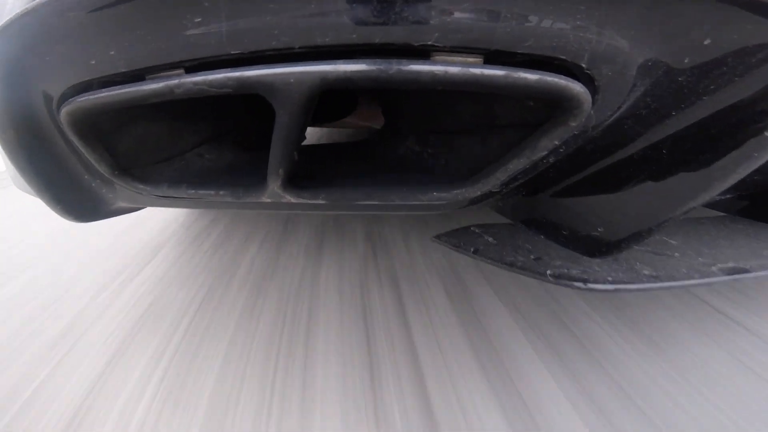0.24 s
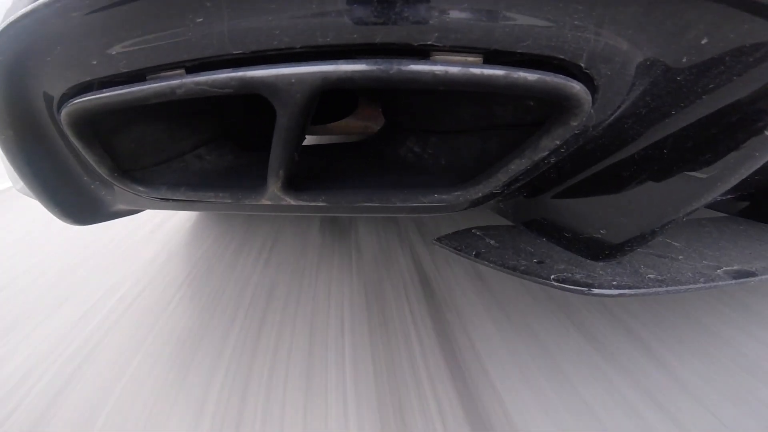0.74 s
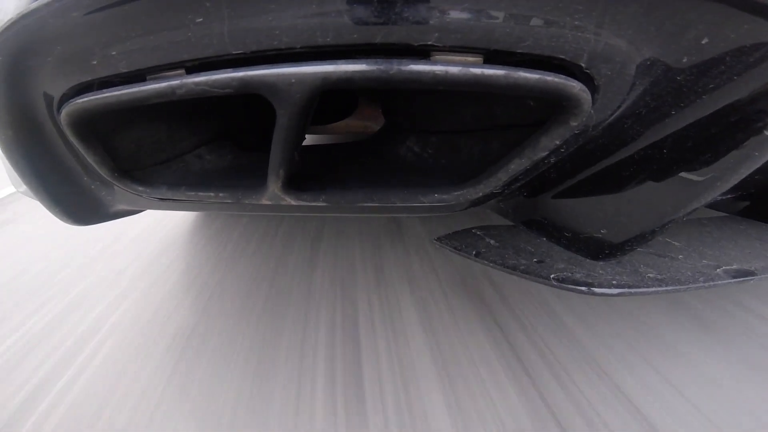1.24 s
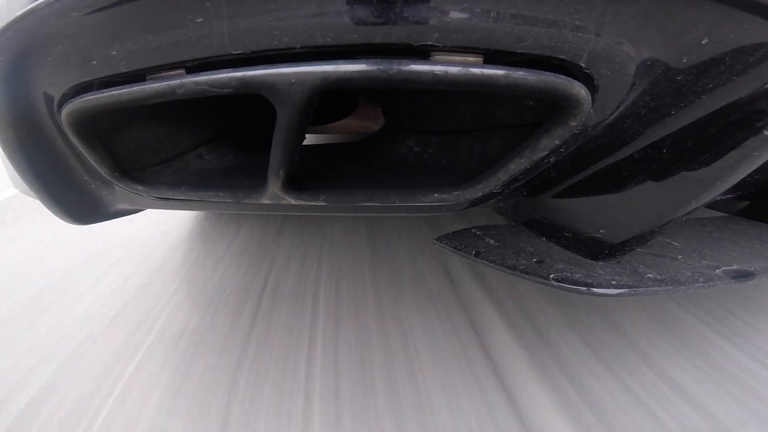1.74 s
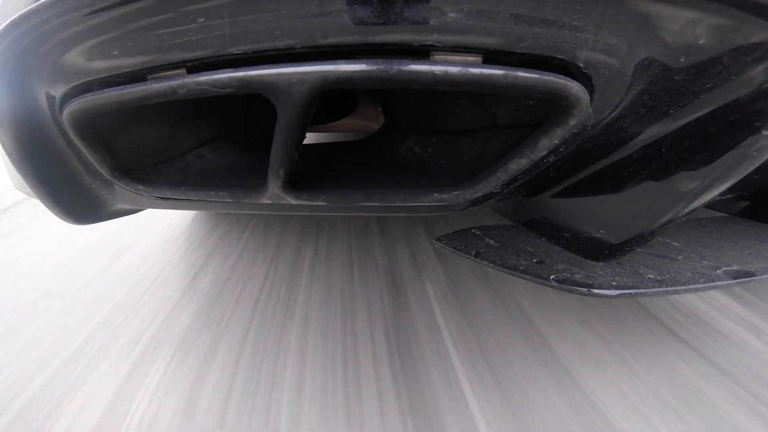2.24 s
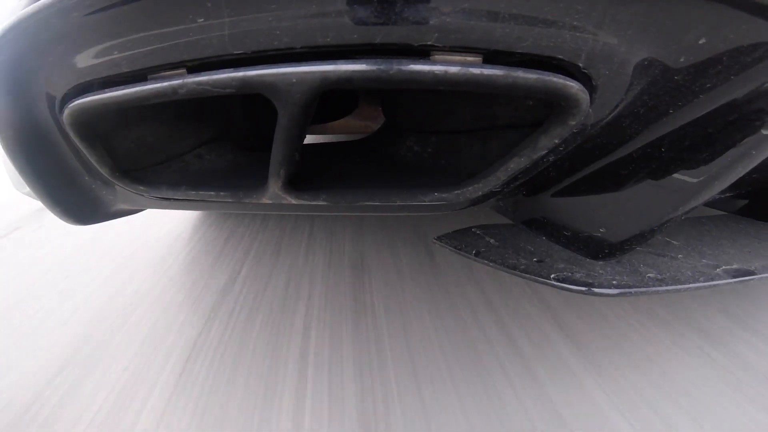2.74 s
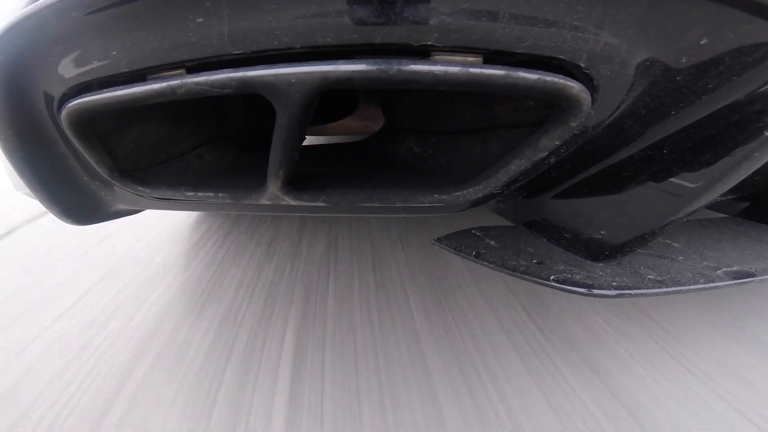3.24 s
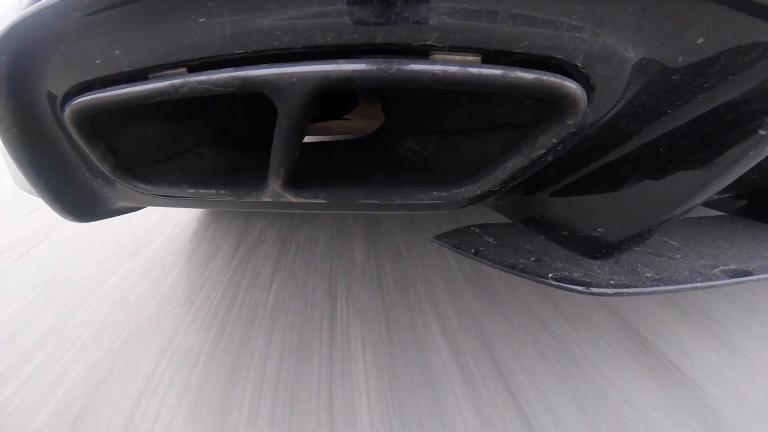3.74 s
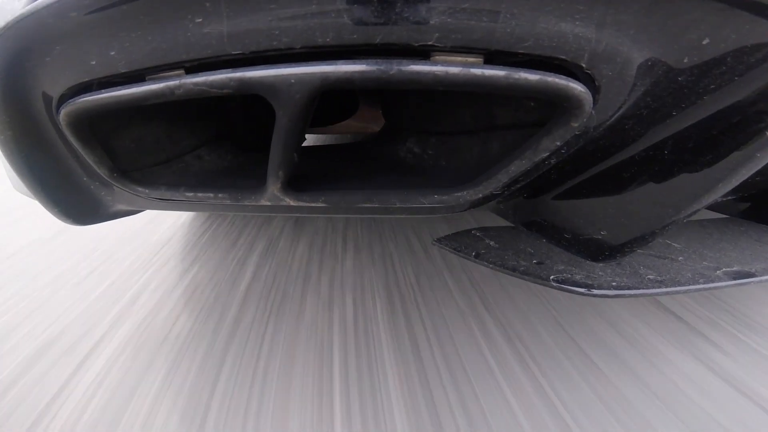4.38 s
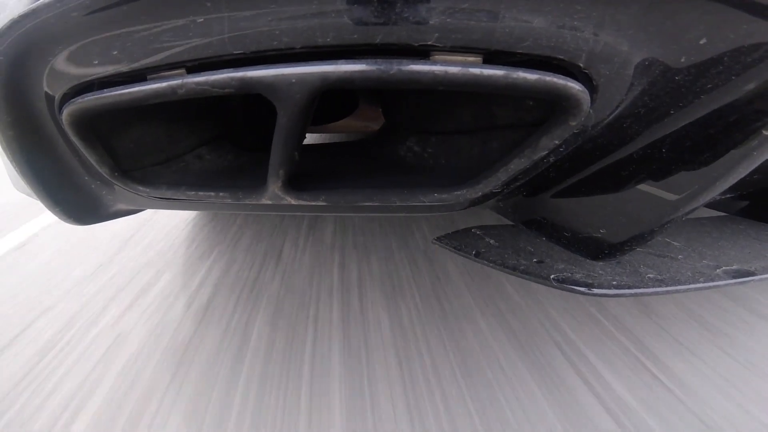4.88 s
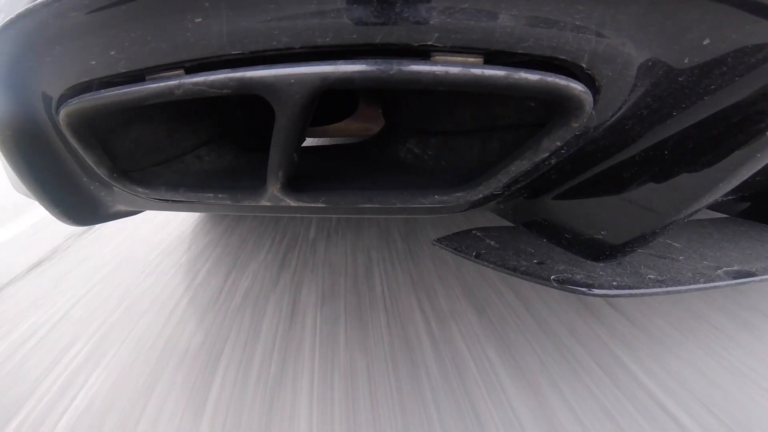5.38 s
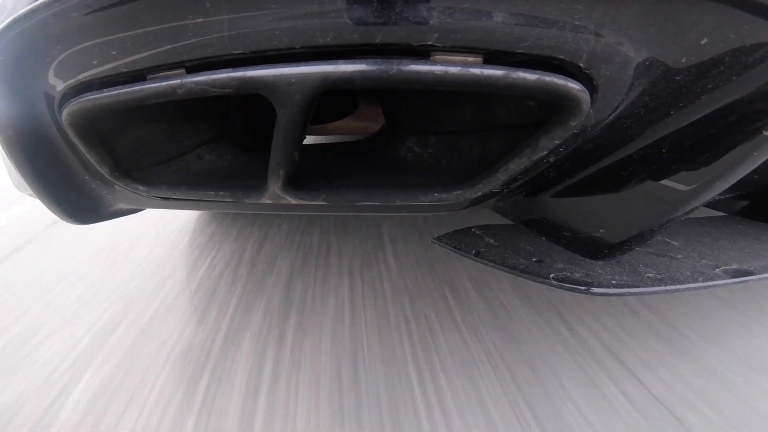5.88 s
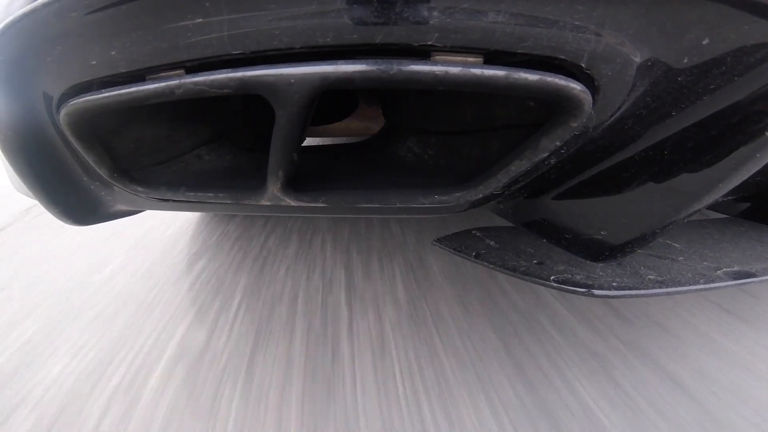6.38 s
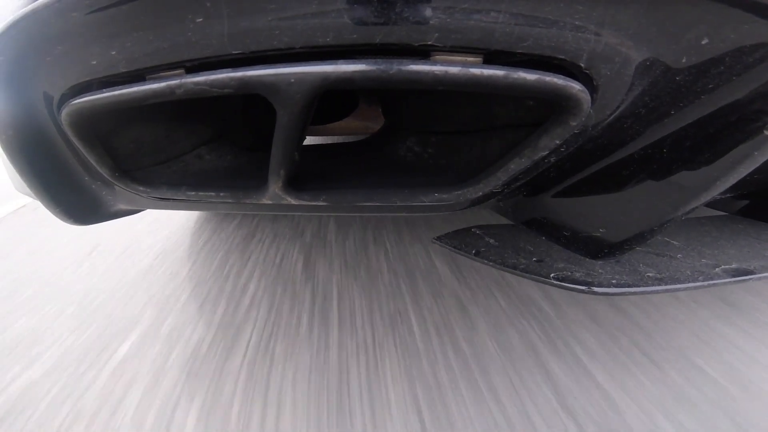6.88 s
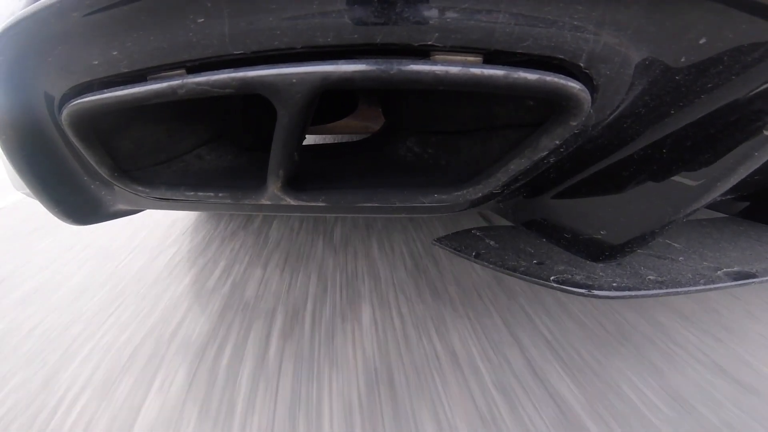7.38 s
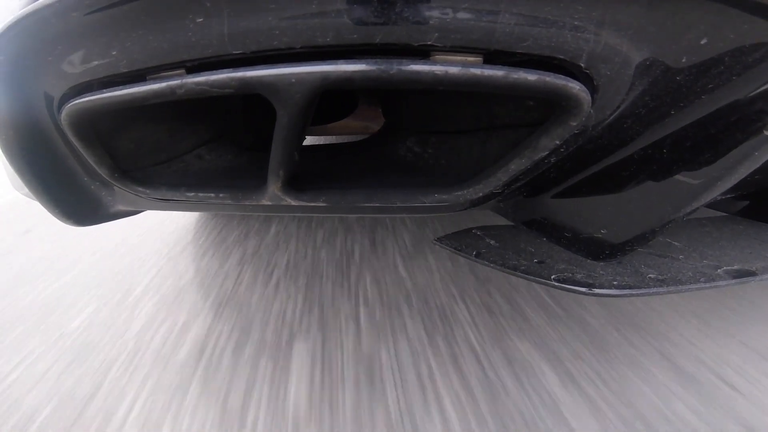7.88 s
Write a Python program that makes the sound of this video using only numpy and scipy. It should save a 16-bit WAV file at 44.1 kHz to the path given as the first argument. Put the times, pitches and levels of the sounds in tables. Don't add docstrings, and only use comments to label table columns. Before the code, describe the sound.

Very close, dry outdoor pickup beside the exhaust of a car lifting off the throttle. Crackling, raspy bangs come first, then two loose clusters of deeper, ringing pops with low thumps. The background is ducked by them and opens up again: a steady buzzing hum falling gradually in pitch, with road hiss, wind rumble and a hollow tyre resonance late on.

```python
import sys
import numpy as np
from scipy import signal
from scipy.io import wavfile
from scipy.ndimage import uniform_filter1d, map_coordinates

SR = 44100
rng = np.random.default_rng(int(sys.argv[2]) if len(sys.argv) > 2 else 0)


def attenuation_scalar(level_db):
    decades = np.asarray(level_db, float) / 20
    return 10 ** decades


def wav_out(sig):
    wavfile.write(sys.argv[1], SR, np.round(np.clip(np.atleast_2d(sig).T, -1, 1) * 32767).astype(np.int16))


N = 358091


def evened(x):
    return x / np.sqrt(np.mean(x ** 2) + 1e-20)


def curves(rows):
    s, *columns = np.transpose(rows)
    return [np.interp(np.arange(N) / SR, s, c) for c in columns]


def add(mix, s, sound):
    part = mix[round(s * SR):][:len(sound)]
    part += sound[:len(part)]


def wander(hz):
    knots = rng.standard_normal(2000)
    smooth = map_coordinates(knots, [np.arange(0, N + 64, 64) / SR * hz], order=3)
    return np.interp(np.arange(N), np.arange(len(smooth)) * 64, smooth)


def slope(points):
    f, db = np.transpose(points)
    return lambda hz: attenuation_scalar(np.interp(np.log(hz + 1), np.log(f + 1), db, left=-60, right=-90))


def noise(shape, patchy_db, flicker_db, size):
    frames, hz = 4 * N // size + 5, np.fft.rfftfreq(size, 1 / SR)
    a, b, patches = rng.standard_normal((frames, len(hz), 3)).T
    patches = uniform_filter1d(patches, size=8, axis=0)
    patches = evened(uniform_filter1d(patches, size=8, axis=1))
    flicker = rng.standard_normal(frames)
    z = (a + 1j * b) * shape(hz)[:, None] * attenuation_scalar(patchy_db * patches + flicker_db * flicker)
    return evened(signal.istft(z, nperseg=size, noverlap=3 * size // 4)[1][:N])


# time in seconds, amount from 0 to 1.
MISFIRING = [(0, 0.94), (.46, 0.85), (.56, 0.6), (.9, 0.5), (1.45, 0.3), (1.9, 0), (2.4, 0.09), (8.12, 0.2)]


def misfiring():
    return curves(MISFIRING)[0]


def running(clean, added):
    return clean + added * misfiring()


# time in seconds, level in dB.
FLOW_LEVEL = [(0, -32.5), (.04, -37), (.15, -54), (.33, -44), (.47, -43.5), (.6, -52), (.96, -40.5),
              (1.07, -43.5), (1.67, -39), (2.41, -35), (3.63, -32.5), (4.9, -31.5), (5.8, -32.5),
              (6.35, -35.5), (6.71, -36.5), (6.86, -39.5), (8.12, -40)]


def flow_db():
    return curves(FLOW_LEVEL)[0]


# frequency in Hz, width in Hz, level in dB.
PIPE_MODES = [(70, 130, -4.5), (220, 34, -9), (259.6, 27, -11), (320, 31.5, 1.5), (382.7, 38, -12.5),
              (449, 65, -13), (625, 57, -9.5), (662.2, 46, -2.5), (726, 9.7, -17)]


def pipe_gain(hz):
    dip = 1 - .92 / (1 + ((hz - 462) / 18) ** 2)
    power = sum(attenuation_scalar(2 * db) / (1 + (2 * (hz - f) / w) ** 2) ** 1.95 for f, w, db in PIPE_MODES)
    return dip * np.sqrt(power)


# middle in seconds, level over the lull in dB,
# half-length in seconds.
GUSTS = [(0.095, 12.5, 0.19), (0.333, 6, .05), (0.723, 6, 0.03), (0.983, 4, 0.03), (1.2, 3, .1),
         (1.85, -1, 0.052), (2.228, 8, 0.34), (2.554, 4.5, .08), (3.492, 7.5, 0.11), (3.84, 11.5, 0.073),
         (4.326, 9.5, 0.22), (4.828, 9.5, 0.067), (5.071, 7, 0.09), (5.798, 9.5, 0.61), (6.37, 3, 0.042),
         (6.593, 8, 0.053), (6.865, 12, 0.19), (7.202, 12, 0.058), (7.43, 11, 0.081), (7.648, 12, 0.1),
         (8.097, 8, 0.29)]
# frequency in Hz, density in dB per Hz.
RUMBLE_SPECTRUM = [(12, -14), (25, -2), (60, -8), (90, -7), (140, -16.5)]


def wind():
    lull_db, follows = -36, 0.54
    t = np.arange(0, N, 64) / SR
    gusts_db = sum(db * np.exp(-((t - s) / half) ** 2) for s, db, half in GUSTS)
    level_db = lull_db + follows * (flow_db() - lull_db) + np.interp(np.arange(N) / SR, t, gusts_db)
    return attenuation_scalar(level_db) * noise(slope(RUMBLE_SPECTRUM), patchy_db=.2, flicker_db=.2, size=2048)


# time in seconds, level against the flow in dB.
CAVITY_LEVEL = [(0, -9), (2, -7), (4, -8), (4.9, -6.5), (5.4, 0), (5.9, 0.5), (6.3, -2.5), (6.8, 3),
                (7.4, 3.5), (8.12, -9)]


def tyre_cavity():
    mid_hz, width_hz = 209.5, 24
    band = noise(lambda hz: 1 / (1 + (2 * (hz - mid_hz) / width_hz) ** 2),
                 patchy_db=3.0, flicker_db=1.5, size=2048)
    return attenuation_scalar(flow_db() + curves(CAVITY_LEVEL)[0]) * band


# frequency in Hz, density in dB per Hz.
ROAR_SPECTRUM = [(430, -17), (720, -7), (1130, -3), (1480, -7.5), (1870, -15.5), (2730, -23), (3300, -30),
                 (3800, -35), (4500, -56.5)]
HISS_SPECTRUM = [(2400, -1.5), (3500, -6), (4100, 2), (5000, 0), (6300, -9.5), (8000, -18.5), (10000, -48),
                 (12000, -59)]
RUSH_SPECTRUM = [(90, 5), (170, 0.5), (260, -3), (450, -5), (530, -9), (800, -13.5), (1100, -20.5)]


def roar_and_rush(turns):
    roar = noise(slope(ROAR_SPECTRUM), patchy_db=0.94, flicker_db=-0.2, size=512)
    hiss = noise(slope(HISS_SPECTRUM), patchy_db=.4, flicker_db=.4, size=512)
    rush = noise(lambda hz: slope(RUSH_SPECTRUM)(hz) * (1 + .6 * pipe_gain(hz)),
                 patchy_db=3.0, flicker_db=1.75, size=1024)
    gas = roar + attenuation_scalar(running(-31.5, 4)) * hiss + attenuation_scalar(running(-0.5, 11.5)) * rush
    puffs = 1 + 0.027 * np.cos(2 * np.pi * turns)
    return attenuation_scalar(flow_db()) * gas * puffs


# frequency in Hz, density in dB per Hz.
RASP_SPECTRUM = [(900, -20), (1600, 0), (2500, -1), (3300, -3.5), (3700, -16.5), (5000, -19.5), (7500, -31),
                 (9500, -54)]


def rasp(turns):
    jet = noise(slope(RASP_SPECTRUM), patchy_db=1.1, flicker_db=1.2, size=256)
    return attenuation_scalar(flow_db() + running(-38, 36.5)) * jet * (1 + 0.5 * np.cos(2 * np.pi * turns))


# start in seconds, peak in dB.
SEAM_TICKS = [
    (2.962, -54),
    (6.7177, -43.5),
    (6.7265, -36.5),
]


def seam_ticks():
    out, t = np.zeros(N), np.arange(4000) / SR
    for s, db in SEAM_TICKS:
        decay = attenuation_scalar(db + 16.5 - 60 * t / 0.001) * np.minimum(t / 0.00011, 1)
        add(out, s, decay * np.cos(2 * np.pi * 2500 * t))
    return out


# middle in seconds, frequency in Hz, level in dB,
# half-length in seconds.
HOWLS = [
    (-0.002, 420, -21.5, .03),
    (0.811, 645, -42, 0.056),
    (0.858, 640, -41, .04),
    (0.96, 657, -39, 0.038),
    (1.265, 640, -41, 0.03),
    (1.442, 650, -47, 0.083),
]


def howl():
    s, hz, db, half = np.transpose(HOWLS)
    away = (np.arange(N) / SR - s[:, None]) / half[:, None]
    db = db[:, None] - 18 * away ** 2
    strongest_hz = hz[db.argmax(axis=0)]
    turns = np.cumsum(strongest_hz * (1 + 0.024 * wander(hz=44.0))) / SR
    return attenuation_scalar(db.max(axis=0) + 5.9 * wander(hz=36.65)) * np.sqrt(2) * np.cos(2 * np.pi * turns)


# middle in seconds, peak
# in dB, frequency in Hz.
GAS_SURGES = [(0.0162, -16, 90), (0.032, -25, 120), (.051, -31, 100), (.381, -18, 110), (.715, -32, 90),
              (.789, -21, 68), (0.898, -29.5, 60), (0.931, -21.5, 44), (1.101, -15.5, 44),
              (1.162, -19.5, 49.4), (1.296, -25, 55.4), (1.418, -26, 44), (1.469, -20.5, 50.3),
              (1.69, -21, 90), (2.83, -17, 120), (4.374, -17, 140)]
AIR_GULPS = [(.0021, -17, 420), (.005, -24, 380), (.0099, -17, 480), (.0116, -10, 520), (0.019, -13, 300),
             (0.0294, -9, 342), (.036, -19, 222), (0.043, -16, 220), (0.0635, -17, 200), (0.2, -17, 150),
             (.3775, -18, 200), (0.396, -19, 180), (1.0893, -21, 150), (1.155, -19, 110)]


def surges():
    lead = 700
    out, t = np.zeros(N + lead), np.arange(-lead, 1500) / SR
    for sign, rows in ((0.86, GAS_SURGES), (-0.67, AIR_GULPS)):
        for s, db, hz in rows:
            bell = np.exp(-(t * hz / .55) ** 2)
            add(out, s, sign * attenuation_scalar(db) * bell * np.cos(2 * np.pi * hz * t))
    return out[lead:][:N]


# time in seconds, firing rate in Hz.
FIRING_RATE = [(0.0, 150), (.26, 146), (.4, 151.4), (0.5, 146.6), (.63, 150), (1.0, 152.9), (1.83, 149.8),
               (2.49, 145.7), (2.82, 142.7), (3.81, 135.6), (4.8, 131.4), (5.13, 128.2), (5.79, 117.5),
               (6.45, 105.1), (6.78, 99.5), (7.11, 94.9), (8.12, 82.4)]
# time in seconds, level in dB.
FIRING_TONE = [(0, -23.5), (.11, -49.5), (.22, -38), (.4, -33.5), (.65, -48.5), (.8, -38), (1.3, -46),
               (1.39, -41), (1.5, -36), (2.26, -27.5), (3.27, -23), (5.76, -19), (6.66, -15.5), (7.08, -20),
               (7.8, -17.5), (8.12, -18)]
# multiple of the firing rate, level in dB.
BANK_ORDERS = [(.5, -4), (1.5, -7.5), (2, 5), (2.5, 0.5), (3, 7.5), (3.5, -0.5), (4, -1), (4.5, -3.5),
               (5, 2), (5.5, 0.5), (6, 3), (6.5, -5.5), (7, 2), (7.5, 3), (8, 1.5), (8.5, -4), (9, -5)]
CYLINDER_ORDERS = [(1.75, -11), (2.25, -8.5), (2.75, -16), (3.25, -10), (3.75, -1), (4.25, -13),
                   (4.75, -13.5)]
# start in seconds, end in seconds, change in dB.
INJECTOR_CUTS = [
    (0.679, 0.83, -16),
    (0.898, 1.013, -7.5),
    (1.08, 1.523, -8),
]


def engine():
    (hz,), (tone_db,) = curves(FIRING_RATE), curves(FIRING_TONE)
    t, coarse = np.arange(N) / SR, np.arange(0, N, 64)
    turns = np.cumsum(hz * (1 + 0.0028 * wander(hz=25.33))) / SR
    out = attenuation_scalar(tone_db + 0.041 * wander(hz=26.4)) * np.sqrt(2) * np.cos(2 * np.pi * turns)
    cut_db = sum(db * (t > a) * (t < b) for a, b, db in INJECTOR_CUTS)
    orders_db = (flow_db() + running(7, 3) + uniform_filter1d(cut_db, size=1500))[coarse]
    between_db = running(-1.5, -11)[coarse]
    misfire = misfiring()[coarse]
    uneven_db = .5 + 1.8 * 5 * np.maximum(misfire - .2, 0) * np.maximum(1.1 - misfire, 0)
    past_silencer = {2: .6, 3: .25, 4: 1.3, 5: 1.3}
    for multiple, db in [*BANK_ORDERS, *CYLINDER_ORDERS]:
        waver_db = uneven_db * 2.3 * np.tanh(wander(hz=20)[coarse])
        level_db = orders_db + between_db * (multiple % 1 > 0) + db + waver_db
        bypass = attenuation_scalar(-9.5) * misfire ** 3 * past_silencer.get(multiple, 0)
        level = attenuation_scalar(level_db) * (pipe_gain(hz[coarse] * multiple) + bypass)
        phase = 2 * np.pi * (multiple * turns + rng.random())
        out += np.interp(np.arange(N), coarse, level) * np.cos(phase)
    return out, turns


BAFFLE_ECHOES = [(1, .6), (2.1, .5), (3.1, .15), (4.3, -.15), (5.3, .12)]


def front_and_echoes(u, dull, spacing_ms, luck):
    body = (1 - .6 * u) * np.exp(-u ** 2) - .3 * np.exp(-((u - 3) / 1.8) ** 2)
    flutter, v = .6 + .55 * dull, u[:400]
    for (k, gain), r in zip(BAFFLE_ECHOES, luck[2:]):
        s = k * spacing_ms / 1000 * (.97 + .06 * r)
        echo = np.exp(-(v / (1 + 110 * s)) ** 2) - 0.069 * np.exp(-((v - 3) / 2) ** 2)
        add(body, s, flutter * gain * echo)
    return body


# frequency in Hz, level in dB, 60 dB decay time in seconds.
RING_MODES = [(174, -10.5, 0.035), (321, -8.5, 0.031), (675, -11.5, 0.035), (874, -19, 0.035),
              (1252, -27, 0.055), (1790, -24, 0.031), (2317, -21.5, 0.036), (2910, -17.5, 0.017)]


def pipe_ring(t, dull, luck):
    ring = np.zeros(len(t))
    for (f, db, t60), r in zip(RING_MODES, luck):
        deep_db = dull * (-10.5 * (f < 250) + 2 * (600 < f < 1300))
        phase = 2 * np.pi * (f * (0.927 + 0.13 * r) * t + 0.44 * r)
        ring += attenuation_scalar(db + deep_db - 60 * t / t60) * np.sin(phase)
    return ring * np.minimum(t / 0.00049, 1)


def silenced(body, u, dull, peak_db):
    muffled = signal.sosfilt(signal.butter(8, 3700 - 1100 * dull, fs=SR, output="sos"), body)
    muffled += attenuation_scalar(-17) * (1 - dull) ** 4 * np.exp(-(3 * u) ** 2)
    trap_hz, trap_width_hz = 462, 120
    muffled = signal.lfilter(*signal.iirnotch(trap_hz, trap_hz / trap_width_hz, SR), muffled)
    reach_hz = np.clip(13900 * attenuation_scalar(peak_db + 8.5 * (0.5 - dull)), 300, 15000)
    return signal.lfilter(*signal.butter(1, reach_hz, fs=SR), muffled)


def sizzle(debris, t, dull):
    flash = signal.sosfilt(signal.butter(2, [3900, 6600], "band", fs=SR, output="sos"), debris)
    embers = signal.sosfilt(signal.butter(4, 6500, fs=SR, output="sos"), flash)
    return attenuation_scalar(-28 * dull - 60 * t / .009) * flash + attenuation_scalar(-13 + 6 * dull - 60 * t / .06) * embers


def pop(peak_db, sizzle_db, boom_db, spacing_ms, luck):
    t = np.arange(3000) / SR
    dull = np.clip((peak_db - sizzle_db - 34.0) / 35, 0, 1)
    u = (t - .0006) / (.00014 + .00007 * dull)
    body = front_and_echoes(u, dull, spacing_ms, luck)
    t = np.maximum(t - .0005, 0)
    body += pipe_ring(t, dull, luck)
    debris = luck[10:2010] - .5
    body[20:2020] += debris * attenuation_scalar(-13 + 8 * dull - 60 * t[:2000] / (.03 + .015 * dull))
    boom_hz = 80 - 26 * dull
    swing = np.sin(2 * np.pi * boom_hz * t + 2.1) * attenuation_scalar(6.0 - 60 * t / .06) * np.minimum(t / 0.003, 1)
    out = attenuation_scalar(peak_db + 4.5) * silenced(body, u, dull, peak_db) + attenuation_scalar(boom_db) * swing
    out[25:2025] += attenuation_scalar(sizzle_db + 26) * sizzle(debris, t[:2000], dull)
    return out


# start in seconds, peak
# in dB, sizzle above 4 kHz in dB, boom in dB, # spacing of the repeats in milliseconds.
FUEL_POPS = [(0.01, -29, -58, -33, 1.9), (0.021, -34, -58, -34, 1.3), (0.0315, -16, -49, -16, 1.5),
             (0.0505, -23, -51, -30, 1), (0.0652, -17, -63, -26, 1.9), (0.0912, -17, -50.5, -22, 1.1),
             (0.1072, -11.5, -32, -29, 1.36), (0.1353, -12, -33.5, -16, 0.53),
             (0.152, -11, -33.5, -28, 1.1), (0.183, -12.5, -39.5, -22, 0.54), (0.195, -19, -78, -17.5, 1.8),
             (0.2072, -22, -50, -28, 1.2), (0.215, -21.5, -64, -21, 1.3), (0.3, -39, -71, -40, 0.97),
             (0.316, -34, -73, -40, 1.1), (.3375, -26, -75, -42, 1.1), (.3964, -34, -69, -36, 0.99),
             (0.4175, -25, -63.5, -26, 1.2), (0.52, -43, -77, -51, 1), (.605, -31.5, -69, -52, 1.7),
             (0.887, -30, -59, -25, 1.3), (0.8975, -22.5, -70, -26, 1), (.925, -26, -65, -40, 1),
             (1.0812, -21, -57, -25, 0.95), (1.0915, -11, -50, -35, 0.71), (1.14, -17.5, -62, -34, 1.16),
             (1.2377, -15.5, -82, -21, 1.17), (1.255, -21, -84, -22, 1.4), (1.2644, -19.5, -71, -16.5, 1.2),
             (1.2774, -23, -78, -34, 1.8), (1.375, -15.5, -70, -17, 1.16), (1.3961, -11.5, -63, -22, 0.7),
             (1.406, -18, -75, -20, 0.9), (1.436, -23, -79, -32, 1.2), (1.4461, -16, -85, -21, 1.36),
             (1.466, -23.5, -88, -38, 1.2), (3.902, -16.5, -88, -25, 1.1)]


def fuel_pops():
    pops, duck_db = np.zeros(N), np.zeros(N)
    t = np.arange(4000) / SR
    for (s, *row), luck in zip(FUEL_POPS, rng.random((len(FUEL_POPS), 2010))):
        add(pops, s - .0008, pop(*row, luck))
        add(duck_db, s, -45 * attenuation_scalar(row[0]) * np.minimum(t / 0.071, 1) * np.exp(-(t / 0.017) ** 2))
    return pops, duck_db


def scene():
    drone, turns = engine()
    pops, duck_db = fuel_pops()
    steady = wind() + tyre_cavity() + roar_and_rush(turns) + rasp(turns) + drone
    return (steady * attenuation_scalar(duck_db) + seam_ticks() + howl() + surges() + pops)[None]


def low_pass(x):
    return signal.sosfilt(signal.butter(12, 15800, fs=SR, output="sos"), x)


def record(dry):
    rounded = .65 * np.tanh(dry / .65)
    floor = attenuation_scalar(-116) * rng.standard_normal(dry.shape)
    fade_in = np.minimum(np.arange(N) / 30 + .3, 1)
    ends = np.minimum(np.arange(N, 0, -1) / 120, fade_in)
    return low_pass(rounded * ends + floor)


dry = scene()
out = record(dry)
wav_out(out)
```